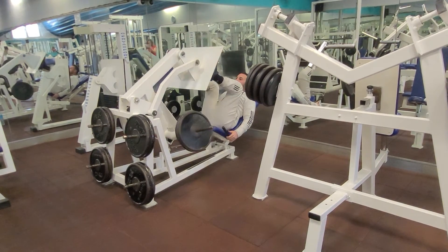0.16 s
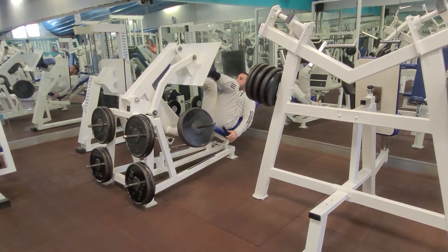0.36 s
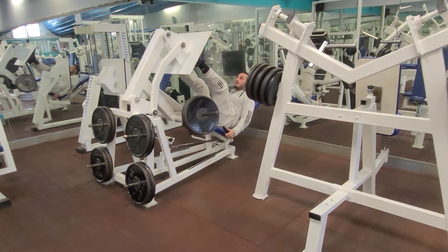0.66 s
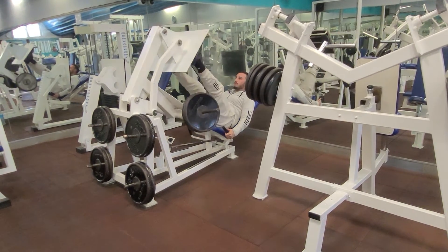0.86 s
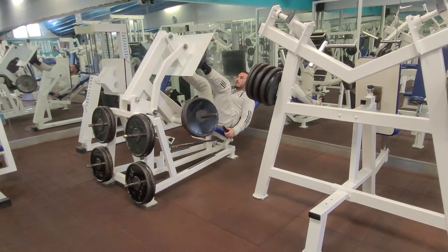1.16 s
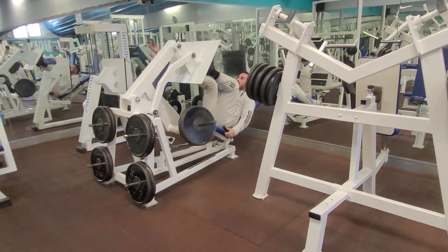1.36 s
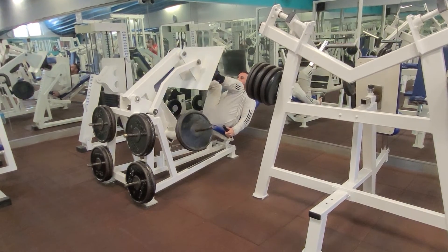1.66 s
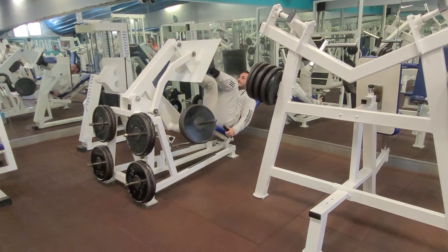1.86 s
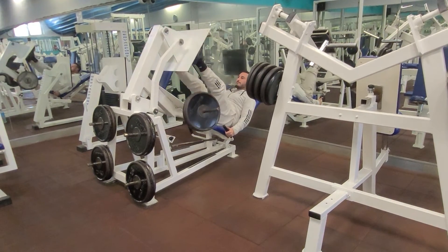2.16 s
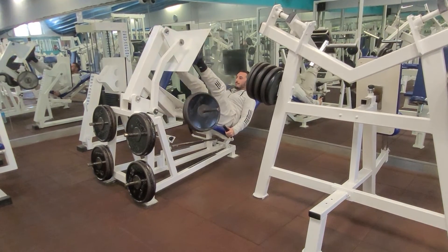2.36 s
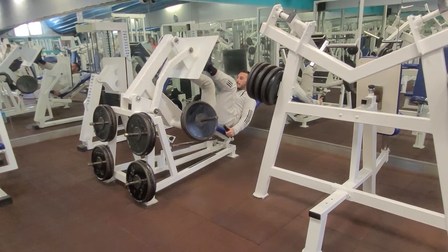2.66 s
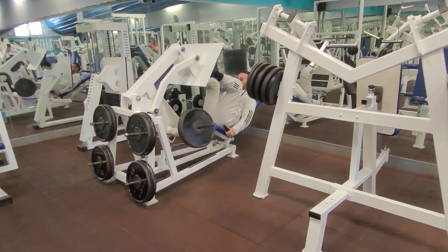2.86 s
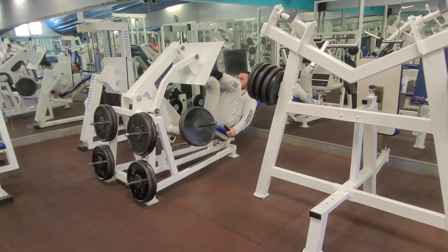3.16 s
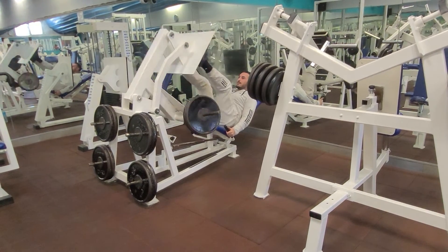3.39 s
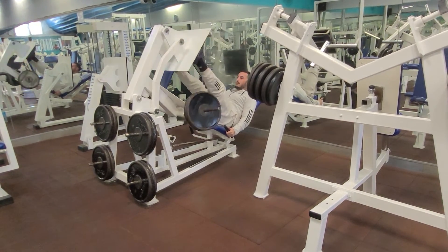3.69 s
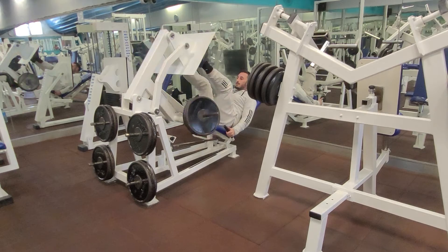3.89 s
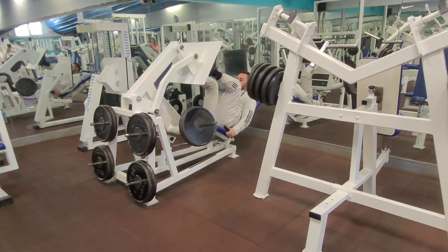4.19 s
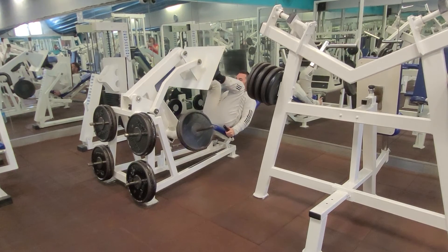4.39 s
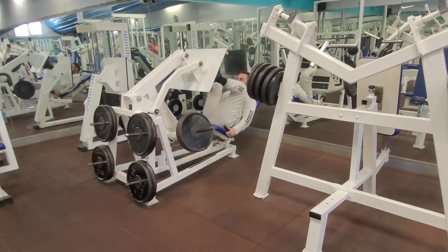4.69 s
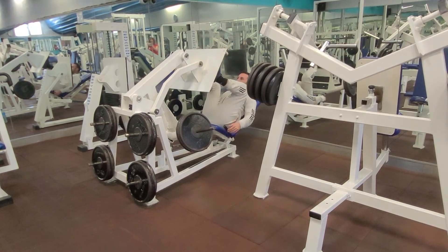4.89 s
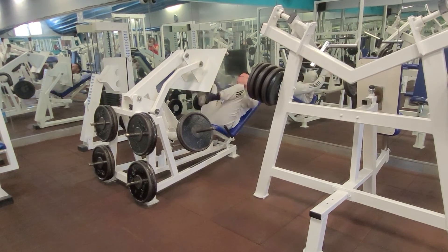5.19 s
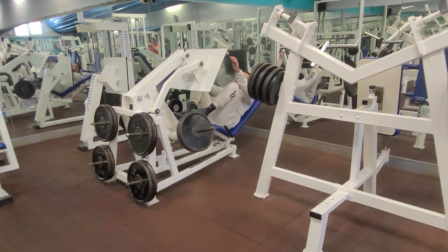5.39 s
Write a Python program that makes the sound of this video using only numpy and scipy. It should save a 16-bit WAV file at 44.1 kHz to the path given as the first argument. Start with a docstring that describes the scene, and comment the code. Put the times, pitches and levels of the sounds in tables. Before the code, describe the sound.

A weighted leg press works a few metres from a stereo pair in a live, echoing gym. Iron plates crack and clink as the sled reverses, with a double steel clunk at the top and soft low rumbling between. Later a safety catch clatters, the frame bangs and shudders in a run of irregular knocks, and clothing slides loudly across a vinyl backrest. Quiet ventilation hums throughout.

```python
"""A reverberant gym: a loaded leg press a few metres from a pair of microphones. The sled rumbles up and
down and its iron plates clink at each reversal, as decaying modes and short noise bursts; it is then racked,
the catch clatters, the steel frame knocks and shudders, and clothes slide over the vinyl backrest as swells
of coloured noise. Ventilation hums underneath: steady coloured noise and a faint tone."""
import sys
import numpy as np
from scipy import signal
from scipy.fft import rfft, irfft, next_fast_len
from scipy.io import wavfile
from scipy.ndimage import map_coordinates

SR = 44100
rng = np.random.default_rng(int(sys.argv[2]) if len(sys.argv) > 2 else 0)


def materialize(psi):
    """Save the field psi as 16-bit PCM at rate SR to the path in sys.argv[1].

    A 1-D psi becomes a single channel; in a 2-D psi each row is a channel.
    """
    bounded = np.clip(np.atleast_2d(psi).T, -1, 1)
    quanta = np.round(bounded * 32767).astype(np.int16)
    wavfile.write(sys.argv[1], SR, quanta)


N = 244461

# colour of a dull thud in the heavy steel: (frequency [Hz], level [dB per Hz])
THUD_COLOUR = [(60, -8), (160, -14), (260, 1.5), (400, 4.5), (520, -3), (740, -1), (1100, -5.5),
               (1500, -17), (2200, -27.5), (4000, -36.5), (8000, -73), (15000, -83)]


def plates():
    """A plate cracks against its neighbour, falls back duller onto its ringing peg, and settles with a thud."""
    # plates tipping on their pegs: (time [s], crack [dB], plate ring [dB], thud in the frame [dB],
    # brightness [dB per octave], peg ring at the rebound [dB])
    clinks = [(-0.018, -42.5, -42.5, -46, -5, -51.5), (1.393, -38, -38.5, -48.5, -1, -47),
              (2.309, -57.5, -73, -56.5, 4.5, -57.5), (2.776, -39, -46.5, -43, 0.5, -44.5)]
    # iron plate: (frequency [Hz], level [dB], t60 [s])
    plate_modes = [(1985, 8.5, 0.028), (2070, -9, 0.061), (2470, 2.5, 0.12), (2536, -5, 0.26),
                   (2640, -4, 0.18), (3100, -6.5, 0.12), (3245, -0.5, 0.22), (3670, -8, 0.14),
                   (4610, 3, 0.12), (4740, 2, 0.052), (4850, -16, 0.16), (5280, -6.5, 0.39),
                   (5060, -13, 0.65), (5460, 2.5, 0.081), (5930, -7, 0.25), (7640, 2, 0.12),
                   (7850, -30, 0.27), (8253, -3.5, 0.32)]
    # steel peg: (frequency [Hz], level [dB], t60 [s])
    peg_modes = [(3257, -6, 0.24), (3313, -14, 0.22), (3410, -7, 0.085), (3590, -12.5, 0.2),
                 (5120, -18, 0.28), (7860, -27, .15)]
    # colour of the crack: (frequency [Hz], level [dB per Hz])
    crack_colour = [(900, -17.5), (1600, -16), (2000, -6.5), (2600, 1), (3300, -6.5), (4000, -6.5),
                    (5000, 0.5), (5800, -2), (6800, -8.5), (8000, -5), (9200, -18), (15500, -33.5)]
    # tip, then rebound: (delay [s], force [dB], thud [dB], brightness [dB per octave], peg [dB])
    contacts = [(0, 0, 0, 0, -18), (0.0205, -5, -3, -6, 0)]  # the tip barely rings the peg
    settle_s, settle_db = 0.09, -5  # the load settles with a last soft thud

    out = np.zeros((2, N))
    for s, crack_db, ring_db, thud_db, bright_db, peg_db in clinks:
        for delay_s, force_db, thud_step_db, bright_step_db, peg_step_db in contacts:
            hit_s = s + delay_s
            hit_bright_db = bright_db + bright_step_db
            plate = ring(plate_modes, hit_bright_db, direct_db=3.5)
            peg = ring(peg_modes, direct_db=0.5)
            crack = burst(crack_colour, t60=0.019, bright_db=hit_bright_db, direct_db=-13)
            thud = burst(THUD_COLOUR, t60=0.19)
            add(out, hit_s, amp(ring_db + force_db) * plate)
            add(out, hit_s, amp(peg_db + peg_step_db) * peg)
            add(out, hit_s, amp(crack_db + force_db) * crack)
            add(out, hit_s, amp(thud_db + thud_step_db) * thud)
        add(out, s + settle_s, amp(thud_db + settle_db) * burst(THUD_COLOUR, t60=0.13))
    return out


def clunks():
    """The sled clunks at the top of its travel and rings the carriage."""
    # (time [s], ring before a fixed trim [dB], thud [dB], brightness [dB per octave])
    blows = [(1.003, -40.5, -49, 3.5), (1.02, -37.5, -49, 0.5), (3.688, -61, -55, -3.5)]
    # sled carriage: (frequency [Hz], level [dB], t60 [s])
    carriage_modes = [(249, -1.5, 0.17), (292, -3, 0.095), (370, -1.5, 0.17), (399, -3, 0.12),
                      (595.6, -6.5, 0.27), (831, -9.5, 0.2), (907, -22, 0.39), (1055, -18.5, 0.24),
                      (1136, -18, 0.14), (1164, -23, 0.12), (1214, -22, 0.3), (1510, -19, 0.11),
                      (1830, -21, 0.24), (1980, -22, 0.25), (1930, -16.5, 0.12), (2030, -19.5, 0.17),
                      (2560, -36.5, 0.38)]
    return knocks(blows, carriage_modes, direct_db=6.0)


def bounces():
    """The sled bounces on its stop and shudders the welded frame."""
    # (time [s], ring before a fixed trim [dB], thud [dB], brightness [dB per octave])
    blows = [(4.628, -41, -56, 5), (4.647, -39, -55, 5.5), (4.69, -34, -44.5, 7), (4.72, -39, -59, 3),
             (4.765, -48, -40, -3), (4.812, -64, -39, 10), (4.828, -35, -50, 3), (4.852, -39.5, -60, 2),
             (4.902, -36, -44, 0.5), (4.956, -32, -50.5, 6.5), (4.976, -38, -59, -3),
             (5.052, -38, -55.5, 3.5), (5.068, -46.5, -48, -2), (5.136, -64, -47.5, 6.5)]
    # welded frame: (frequency [Hz], level [dB], t60 [s])
    frame_modes = [(244, -6.5, 0.15), (285, 0, 0.075), (349, 0, 0.15), (366, -1, 0.079), (407, -7, 0.23),
                   (535, -20.5, 0.3), (598, -21, 0.19), (657, -13, 0.11), (719, -20, 0.27),
                   (821, -19, 0.21), (1070, -7, 0.077), (1296, -20, 0.089), (1554, -7.5, 0.04),
                   (1850, -19, 0.075), (1933, -32, .18), (2046, -22.5, 0.077), (2550, -47, 0.72),
                   (2795, -31.5, 0.074)]
    return knocks(blows, frame_modes, direct_db=4)


def knocks(blows, modes, direct_db):
    """Heavy steel on steel: each blow has its own ring, thud and brightness."""
    out = np.zeros((2, N))
    for s, db, thud_db, bright_db in blows:
        steel = ring(modes, bright_db, direct_db, contact_s=0.0018)
        thud = burst(THUD_COLOUR, t60=0.049, bright_db=bright_db, direct_db=-9.5, contact_s=0.0027)
        add(out, s, amp(db - 1.5) * steel)
        add(out, s, amp(thud_db) * thud)
    return out


def catch(rattle_count=5):
    """The safety catch clatters into place and rattles to rest while its lever rings."""
    # catch swinging in and seating: (time [s], strength before fixed trims [dB],
    # thud in the frame [dB], brightness [dB per octave])
    contacts = list([(3.939, -43, -45, 2), (3.957, -40.5, -52, -3), (3.985, -38.5, -52, 1),
                     (4.02, -47.5, -42.5, -6)])
    # catch lever: (frequency [Hz], level [dB], t60 [s])
    lever_modes = [(611, 7, 0.094), (780, -14, 0.15), (1090, -3, 0.15), (1270, -2, 0.11),
                   (1990, -5.5, 0.23), (2780, -5, 0.21), (3355, 2, 0.14), (3585, -7, 0.49),
                   (3580, -0.5, 0.28), (4140, -7, 0.22), (4630, -5, 0.23), (5017, -8, .25),
                   (5324, -10, 0.18), (5560, -13, 0.097), (7800, 0.5, 0.067)]
    # colour of the clack: (frequency [Hz], level [dB per Hz])
    clack_colour = [(500, -3), (1000, 6), (1600, -15), (2100, 1.5), (2700, -4.5), (3600, 0.5), (5000, -4.5),
                    (6800, -14), (8000, -13), (9500, -17), (15500, -30)]
    wait_s, gap_s, jitter_s = 0.047, 0.027, 0.002  # pause before the rattle, mean spacing and its spread
    rattle_db, rattle_thud_db, loss_db = -59, -44, 4  # first strength, first thud, loss a contact
    rattle_bright_db = -4  # dB per octave

    rattle_start_s = contacts[-1][0] + wait_s
    for k in range(rattle_count):
        s = rattle_start_s + k * gap_s + rng.normal(0, jitter_s)
        contacts.append((s, rattle_db - k * loss_db, rattle_thud_db - k * loss_db, rattle_bright_db))

    out = np.zeros((2, N))
    for s, db, thud_db, bright_db in contacts:
        clack = burst(clack_colour, t60=0.029, bright_db=bright_db, direct_db=-9.5)
        lever = ring(lever_modes, bright_db, direct_db=-7)
        thud = burst(THUD_COLOUR, t60=0.062, direct_db=-2.5)
        add(out, s, amp(db - 1.5) * clack)
        add(out, s, amp(db - 4.5) * lever)
        add(out, s, amp(thud_db) * thud)
    return out


def sled():
    """The moving load rumbles in the frame while its bearings whisper and a bushing rubs unevenly."""
    # the load's travel: (time [s], rumble before a fixed trim [dB])
    travel = [(0.0, -47), (0.08, -66), (0.59, -54), (0.62, -61.5), (1.14, -48), (1.17, -52), (2.7, -54),
              (2.99, -40), (3.07, -60), (3.16, -54.5), (3.63, -41), (3.92, -44), (3.93, -41.5), (4.4, -53),
              (4.58, -46.5), (5.21, -49.5), (5.37, -42.5), (5.54, -53)]
    # colour of the frame rumble: (frequency [Hz], level [dB per Hz])
    rumble_colour = [(20, -29), (45, -15), (58, -2.5), (66, 2.5), (75, -1), (90, -10.5), (130, -19),
                     (300, -46), (800, -83)]
    # runs of the bearings along the rails: (time [s], length [s], level [dB])
    runs = [(0.58, 0.42, -57), (1.36, 0.15, -53), (2.31, 0.05, -55), (3.33, 0.81, -60.5),
            (3.72, 0.089, -53.5), (3.835, 0.11, -52.5), (5.0, 0.38, -52)]
    # colour of the bearings: (frequency [Hz], level [dB per Hz])
    bearing_colour = [(100, -4.5), (250, 3), (600, -6.5), (1100, -13.5), (1350, -23.5), (1600, -22.5),
                      (2100, -23), (2800, -31.5), (4200, -23.5), (6000, -37.5), (12000, -38), (15500, -47)]
    # a bushing rubbing on its rail during the last push: (time [s], length [s], level [dB])
    rubs = [(3.135, 0.02, -76), (3.3, 0.14, -70.5)]
    # colour of the bushing: (frequency [Hz], level [dB per Hz])
    bushing_colour = [(1000, -30), (1400, -7), (1570, 0), (1750, -12), (1950, -6.5), (2300, -15),
                      (2900, -16), (4200, -9.5), (6000, -17), (12000, -47)]
    idle_db = -68.5  # bearing level between runs

    times, levels = np.transpose(travel)
    rumble_db = np.interp(np.arange(N) / SR, times, levels)
    rumble = amp(rumble_db - 2 + 0.92 * wobble(12)) * wash(rumble_colour)
    run_gain = swells(runs, attack_s=0.26, release_s=1.26)
    bearings = np.hypot(run_gain, amp(idle_db)) * wash(bearing_colour)
    rub_gain = swells(rubs, attack_s=0.25, release_s=1) * amp(1.9 * wobble(40))
    return rumble + bearings + rub_gain * wash(bushing_colour)


def cloth(t60=0.36, wet=0.76):
    """Clothes brush and then slide over the backrest, catching unevenly on its grain."""
    # strokes of cloth on vinyl: (time [s], length [s], level [dB],
    # pressure [0-1: firm sliding hisses, light brushing rustles])
    strokes = [(0.555, 0.01, -66, 0.95), (3.685, 0.0064, -60, 0.44), (4.57, 0.02, -41, 0.13),
               (4.772, 0.028, -49, 0.37), (4.89, 0.005, -51, 0.18), (5.153, 0.064, -47.5, 0.73),
               (5.236, 0.069, -31.5, 1)]
    # colour of firm sliding: (frequency [Hz], level [dB per Hz])
    hiss_colour = [(710, -52), (1200, -38), (1670, -44), (1920, -12), (2190, -15), (3180, -4), (3500, -5),
                   (4770, 0.5), (7570, -2), (9370, -11.5), (10800, -9), (15500, -16.5)]
    # colour of light brushing: (frequency [Hz], level [dB per Hz])
    rustle_colour = [(300, -7), (700, 6.5), (1300, 13), (1700, 8.5), (2100, 11), (3200, 7.5), (5000, -2.5),
                     (9000, -5.5), (15500, -9)]
    # the backrest lies further right: (frequency [Hz], left minus right [dB])
    seat_sides = [(1000, 1), (4000, -2), (8000, -0.5), (14000, -8)]

    power = np.zeros((2, N))  # firm, light
    for s, length, db, pressure in strokes:
        stroke = amp(db) * swell(s, length, attack_s=0.061, release_s=0.13)
        power += np.outer([pressure, 1 - pressure], stroke ** 2)
    power *= amp(0.63 * wobble(150)) ** 2
    decay = amp(-60 * np.arange(SR // 2) / SR / t60) ** 2  # the room holds on to the energy
    held = np.abs(signal.fftconvolve(power, decay[None] / decay.sum(), axes=1)[:, :N])
    firm, light = np.sqrt((1 - wet) * power + wet * held)
    return placed(firm * wash(hiss_colour) + light * wash(rustle_colour), seat_sides)


def ventilation():
    """Steady air noise with a faint, slightly wavering motor hum at 59 Hz."""
    # colour of the room air: (frequency [Hz], level [dB per Hz])
    air_colour = [(20, -1.5), (60, -2), (110, -3), (250, -2), (400, -13.5), (800, -22.5), (1200, -27),
                  (1700, -45.5), (3200, -44), (4300, -32.5), (6100, -43.5), (7500, -35.5), (12500, -44),
                  (15000, -49)]
    tone = np.sqrt(2) * np.sin(2 * np.pi * 59.0 * np.arange(N) / SR)
    hum = tone * amp(-59.0 + 2.4 * wobble(3.16))
    return amp(-52.5) * wash(air_colour) + hum


def ring(modes, bright_db=0, direct_db=-4, scatter_db=1.5, contact_s=0.00038):
    """Decaying modes that build up over the contact, struck at slightly new strengths each time."""
    t = np.arange(SR // 2) / SR
    hz, db, t60 = np.transpose(modes)[:, :, None]
    gain = amp(db + scatter_db * rng.standard_normal(hz.shape)) * tilt(hz, bright_db)
    phase = 2 * np.pi * (hz * t + rng.random(hz.shape))
    tone = np.sum(gain * amp(-60 * t / t60) * np.sin(phase), axis=0)
    return heard(tone * (1 - np.exp(-t / contact_s)), direct_db)


def burst(spectrum, t60, bright_db=0, direct_db=-6, contact_s=0.00068):
    """The many short-lived modes of a contact, as decaying coloured noise."""
    t = np.arange(SR // 4) / SR
    decaying = noise(spectrum, len(t), bright_db) * amp(-60 * t / t60)
    return heard(decaying * (1 - np.exp(-t / contact_s)), direct_db)


def heard(x, direct_db):
    """One blow through the room, at rms 1 over its first twentieth of a second."""
    y = gym(x, direct_db)
    return y / np.sqrt(np.mean(y[:, :SR // 20] ** 2))


def gym(x, direct_db, lead_count=14):
    """The direct sound, lead_count samples sooner at the left microphone, with the room's dense tail."""
    # decay of the gym: (frequency [Hz], t60 [s])
    room_t60 = [(100, 1), (400, 0.52), (1000, 0.27), (2800, 0.5), (7000, 0.35), (14000, 0.18)]
    hz, t, z = signal.stft(diffuse(SR * 3 // 4), SR, nperseg=256)
    fading = z * amp(-60 * t / along(room_t60, hz)[:, None])
    tail = signal.istft(fading, SR, nperseg=256)[1]
    tail /= np.linalg.norm(tail[0])
    tail[[0, 1], [0, lead_count]] += amp(direct_db)  # direct arrivals, left then right
    return signal.fftconvolve(x[None], tail, axes=1)[:, :N]


def diffuse(n):
    """White noise from all around: closely alike at both microphones only at low frequencies."""
    # likeness at the two microphones: (frequency [Hz], left-right correlation [0-1])
    likeness = [(60, 0.93), (300, 0.95), (500, 0.68), (1000, 0.39), (2000, 0.0042), (4000, 0.068),
                (12000, 0)]

    def shares(hz):
        turn = np.arccos(np.clip(along(likeness, hz), -1, 1)) / 2
        return np.array([np.cos(turn), np.sin(turn)])

    mid, side = filtered(rng.standard_normal((2, n)), shares)
    return np.array([mid + side, mid - side])


def wash(spectrum):
    """Coloured diffuse noise of rms 1."""
    return unit(filtered(diffuse(N), lambda hz: amp(along(spectrum, hz))))


def noise(spectrum, n, bright_db=0):
    """Coloured noise of rms 1."""
    white = rng.standard_normal(n)
    return unit(filtered(white, lambda hz: amp(along(spectrum, hz)) * tilt(hz, bright_db)))


def swell(s, length, attack_s, release_s):
    """Gain that rises to 1 at s, holds for length and dies away; attack and release each span 60 dB."""
    t = np.arange(N) / SR - s
    return amp(-60 * (np.maximum(-t, 0) / attack_s + np.maximum(t - length, 0) / release_s))


def swells(rows, attack_s, release_s):
    """Joint gain of (time [s], length [s], level [dB]) swells, summed in power."""
    return np.sqrt(sum((amp(db) * swell(s, length, attack_s, release_s)) ** 2 for s, length, db in rows))


def wobble(rate):
    """A smooth random curve, rate knots a second."""
    knots = rng.standard_normal(int(N * rate / SR) + 4)
    return map_coordinates(knots, [np.arange(N) * rate / SR])


def placed(x, sides):
    """Lean each frequency to the left or right."""
    return filtered(x, lambda hz: amp(np.outer([.5, -.5], along(sides, hz))))


def add(out, s, x):
    """Mix x in at s seconds; what falls outside the scene is cut off."""
    start = round(s * SR)
    x = x[:, max(-start, 0):]
    part = out[:, max(start, 0):][:, :x.shape[1]]
    part += x[:, :part.shape[1]]


def filtered(x, response):
    """x times a response of frequency."""
    n = x.shape[-1]
    m = next_fast_len(n + 4096)
    return irfft(rfft(x, m) * response(np.fft.rfftfreq(m, 1 / SR)), m)[..., :n]


def tilt(hz, db):
    """Gain that rises by about db each octave, levelling off in the bass; 1 at 900 Hz."""
    return amp(db * np.log2((hz + 100) / 1000))


def along(points, hz):
    """(frequency [Hz], value) points joined on a log frequency axis."""
    f, v = np.transpose(points)
    return np.interp(np.log(hz + 1), np.log(f + 1), v)


def amp(db):
    """Decibels to an amplitude factor."""
    return 10 ** (np.asarray(db) / 20)


def unit(x):
    """x scaled to rms 1."""
    return x / np.sqrt(np.mean(x ** 2) + 1e-20)


def scene():
    """The machine stands a little off centre in the ventilated gym."""
    # balance of the machine: (frequency [Hz], left minus right [dB])
    machine_sides = [(100, -0.5), (700, 0), (1300, -2.5), (2400, -5), (4400, 2.3), (8100, -1.2),
                     (15000, 11)]
    machine = plates() + catch() + clunks() + bounces() + sled() + cloth()
    return placed(machine, machine_sides) + ventilation()


def record(dry):
    """The microphones' channel keeps nothing from 15750 Hz up."""
    return filtered(dry, lambda hz: hz < 15750)


dry = scene()
out = record(dry)
materialize(out)
```